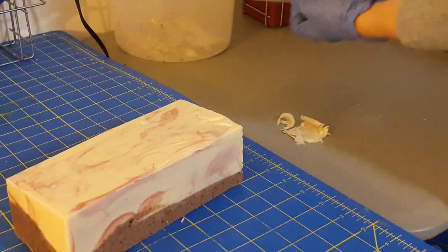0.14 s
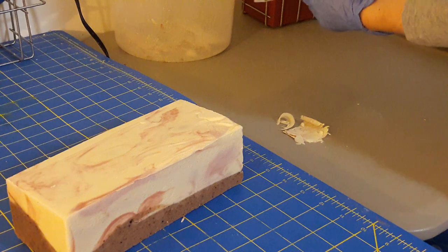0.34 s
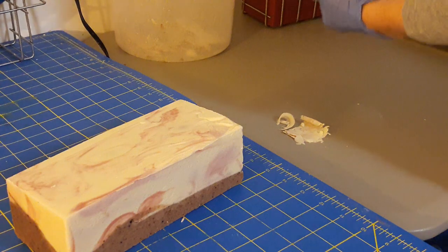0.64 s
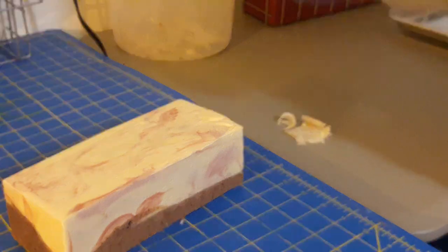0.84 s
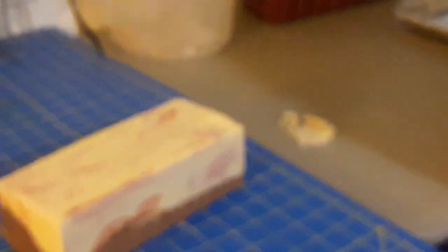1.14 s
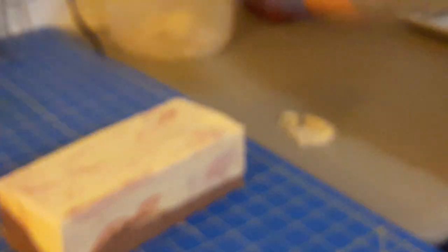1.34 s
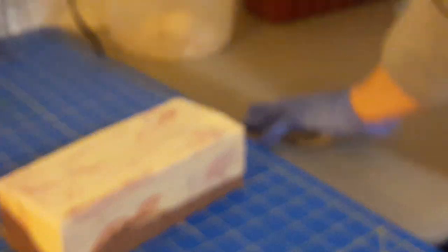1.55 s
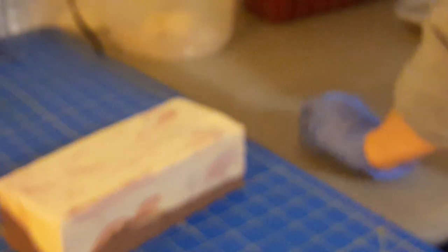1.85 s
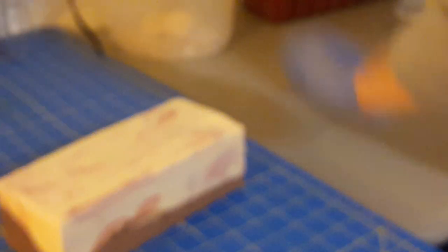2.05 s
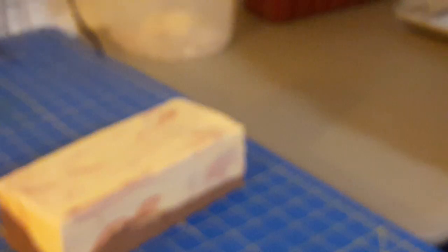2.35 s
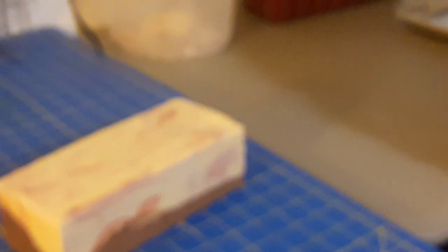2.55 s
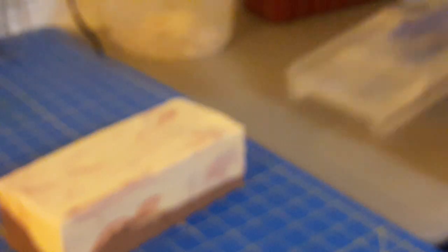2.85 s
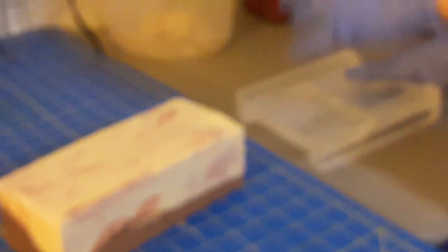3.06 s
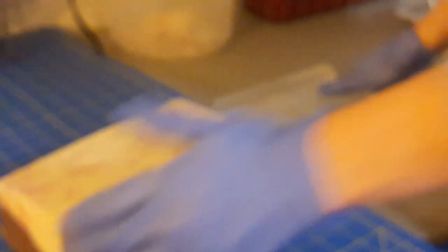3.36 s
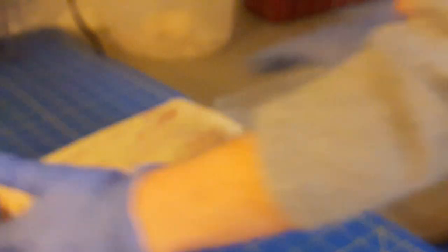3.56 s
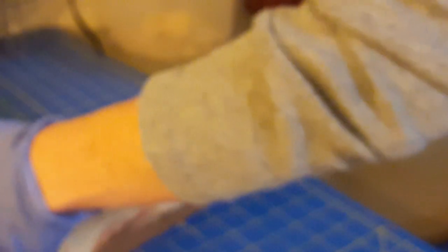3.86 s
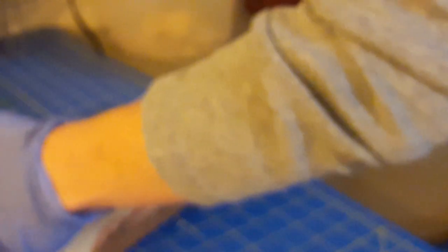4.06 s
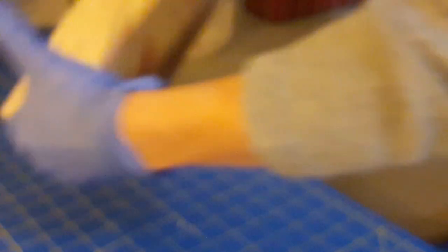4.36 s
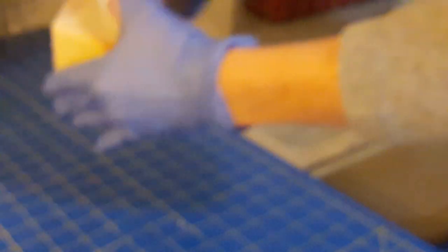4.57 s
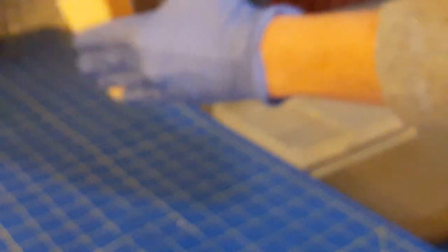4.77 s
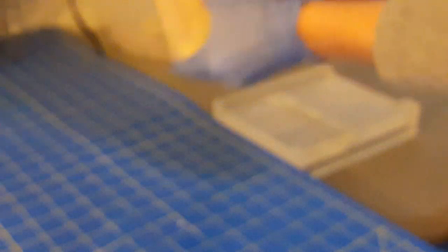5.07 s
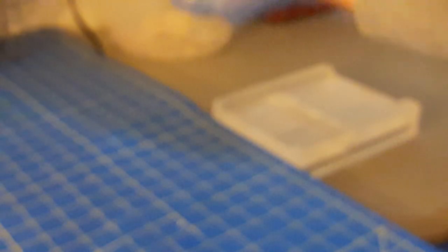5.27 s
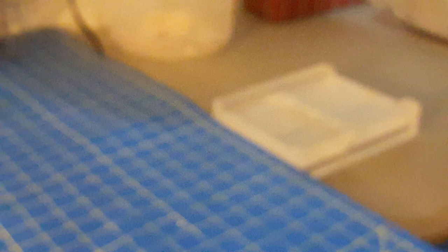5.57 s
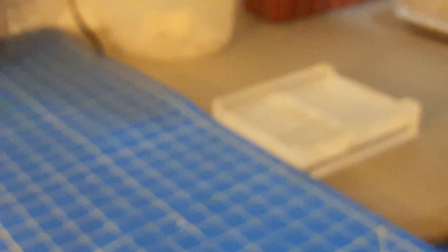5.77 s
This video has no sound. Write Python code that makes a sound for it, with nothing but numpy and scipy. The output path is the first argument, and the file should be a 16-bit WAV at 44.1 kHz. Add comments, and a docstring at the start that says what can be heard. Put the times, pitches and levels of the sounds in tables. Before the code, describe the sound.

A few knocks and a gloved sweep across a workbench, then a plastic planer drops with a hollow clatter over a fan's hum.

```python
"""Soap planer on a workbench

Gloved hands work at a soap maker's bench in a small room where a fan hums. An acrylic planer is put
aside and a hand sweeps shavings away. The planer is picked up, set down rocking on one edge, then drops
flat with a hollow clatter and hums on. A soap loaf is gripped and tipped up. Impacts excite the damped
modes of bench, shell, blade and loaf; rubbing is the noise of many tiny slips."""
import sys
import numpy as np
from scipy import signal
from scipy.fft import rfft, irfft, next_fast_len
from scipy.io import wavfile

SR = 44100
rng = np.random.default_rng(int(sys.argv[2]) if len(sys.argv) > 2 else 0)


def store_pcm(level_fs):
    """Save levels as 16-bit WAV."""
    pcm = np.round(np.clip(level_fs, -1, 1) * 32767).astype(np.int16)
    wavfile.write(sys.argv[1], SR, np.atleast_2d(pcm).T)


N = 261954
TIME = np.arange(N) / SR

# Reverberation time of the room: frequency_hz, t60_s
ROOM_T60 = [(80, 1), (250, 0.32), (700, 0.24), (2000, 0.16), (5000, 0.38), (14000, 0.3)]
# Likeness of left and right in the diffuse field: frequency_hz, correlation
COHERENCE = [(60, 0.85), (300, 0.34), (600, 0.18), (1200, 0), (2500, 0), (14000, 0)]
# Spectrum of the moving air: frequency_hz, level_db
AIR_SPECTRUM = [(25, -10), (42, -12.5), (75, 1.5), (140, -2.5), (230, -1.5), (350, -3), (430, -9),
                (850, -6), (1500, -10.5), (2200, -16), (3600, -25), (7200, -29), (10500, -31.5),
                (13500, -26), (15700, -25.5)]
# Tones of the fan: pitch_hz, rms_db
FAN_TONES = [(344.5, -79), (667.5, -91), (866.7, -88), (1034, -89), (1545, -94)]

# Strokes of the glove over bench, planer and loaf: full_pressure_s, rubbing_db, hiss_db, hold_s
STROKES = [(1.671, -61, -68.5, 0.0081), (1.806, -33.5, -60, 0.043), (1.933, -52, -68.5, 0.054),
           (2.57, -61, -78, 0.086), (3.584, -52.5, -57.5, 0.0232), (3.974, -61, -91.5, 0.02),
           (4.114, -57, -74.5, 0.009)]
# Rustles of glove and sleeve: centre_s, level_db, width_s
RUSTLES = [(0.23, -74.5, 0.018), (0.316, -62.5, 0.0089), (0.629, -67, 0.012), (0.817, -83, 0.022),
           (5.05, -77, 0.0052), (5.284, -80.5, .03)]
# Spectrum of rubbing on the bench: frequency_hz, level_db
RUB_SPECTRUM = [(35, -56), (60, -18), (159, -22), (215, -10), (285, -3), (413, -7.5), (486, -1), (613, -9),
                (810, -10.5), (1120, -18), (1350, -12.5), (2200, -24), (3580, -36.5), (5080, -39.5),
                (15500, -61)]
# Spectrum of the hiss of sliding rubber: frequency_hz, level_db
HISS_SPECTRUM = [(500, -29), (1900, 0), (3500, -1.5), (5200, -3.5), (7200, -3.5), (8300, -11),
                 (10500, -11.5), (15500, -14.5)]
# Spectrum of a rustle: frequency_hz, level_db
RUSTLE_SPECTRUM = [(200, -10), (1400, 5), (2500, -9), (3700, 0), (5500, -17.5), (7300, -11), (10000, -33),
                   (15000, -15)]

# Soft, dull bumps on the bench from hands and settling objects: start_s, thud_db
BUMPS = [(1.4312, -37.5), (1.695, -44.5), (2.579, -49.5), (2.631, -43.5), (3.447, -21.5), (3.629, -37.5),
         (3.972, -51.5)]
# Hard knocks of an edge on the bench: start_s, thud_db, clack_db, tick_db, note_hz, note_db
KNOCKS = [(1.357, -36, -36.5, -37.5, 366, -24.5), (1.3678, -26, -31.5, -47.5, 650, -32),
          (1.3787, -28, -28.5, -48, 867, -26), (1.9298, -48, -46, -68, 710, -43),
          (2.5913, -60.5, -43.5, -60, 880, -33), (2.6217, -47.5, -44.5, -53, 1520, -49),
          (3.1577, -25, -22.5, -37, 397, -33), (3.6016, -39, -41, -39.5, 1350, -40.5),
          (4.1147, -38.5, -43, -56.5, 1097, -42.5)]
# The planer lands on an edge and rocks: start_s, thud_db, clack_db, tick_db, note_hz, note_db, gap_s
LANDINGS = [(3.0451, -14.5, -26.5, -40.5, 346, -17.5, 0.0175), (3.168, -13, -27.5, -42, 439.1, -26, 0.0087)]
# The planer drops flat and bounces: start_s, thud_db, clack_db, tick_db, note_hz, note_db, gap_s, ring_db
DROPS = [(3.323, -15.5, -14, -38, 1480, -24.5, 0.0105, -25.5),
         (3.3716, -15.5, -7, -36, 1172, -17.5, 0.0285, -18.5)]
# Spectrum of a clack on the bench: frequency_hz, level_db
BENCH_CLACK_SPECTRUM = [(30, -47), (90, -19.5), (250, -9.5), (480, -2.5), (650, -1.5), (870, 0),
                        (1080, -3.5), (1450, -7.5), (2200, -13.5), (3500, -26), (6000, -39), (15000, -66.5)]
# Spectrum of a clack of the planer's shell: frequency_hz, level_db
SHELL_CLACK_SPECTRUM = [(30, -51.5), (120, -25.5), (350, -9.5), (620, 8.5), (950, 2.5), (1400, -3.5),
                        (1850, -12), (2300, -15), (3800, -28), (7000, -38.5), (15000, -67.5)]
# Spectrum of the bright tick of hard surfaces: frequency_hz, level_db
TICK_SPECTRUM = [(500, -30.5), (1800, -3), (3500, 0.5), (5200, -5), (6200, -5.5), (7200, -1.5),
                 (8100, -14.5), (8800, -8), (10500, -17), (15500, -21.5)]

# Modes of the loaf landing on the mat: pitch_hz, level_db, t60_s
LOAF_MODES = [(72, -6, 0.32), (115, -5, 0.18), (210, 4, 0.044)]
# Modes of the bench top: pitch_hz, level_db, t60_s
BENCH_MODES = [(98.5, -17, 0.15), (149.7, -9, 0.11), (239.7, -0.5, 0.072), (323.3, 2, 0.059),
               (414, -1, 0.037), (560, -8.5, 0.026)]
# Modes of the steel blade: pitch_hz, level_db, t60_s
BLADE_MODES = [(7100, -25, 0.27), (6950, -27, .25), (8790, -30, .28), (11300, -39, .15), (14300, -33, .15)]
# Stiff upper modes of the planer's shell: pitch_hz, level_db, t60_s
CRACK_MODES = [(2120, -19, .03), (2528, -15.5, 0.014), (2866, -20, .022), (3250, -23.5, .025),
               (4910, -31, .03)]
# Middle modes of the shell, its hollow ring: pitch_hz, level_db, t60_s
SHELL_MODES = [(507, -2.5, 0.089), (545, -1, 0.39), (615, -1, 0.14), (683, -1.5, .22), (800, -5, .22),
               (818, -7.5, 0.41), (916, -4.5, 0.11), (990, -8, 0.22), (1036, -5, 0.35), (1235, -4.5, 0.18),
               (1470, -11.5, .14), (1657, -11.5, 0.12), (2170, -12, 0.089), (2400, -9, .1),
               (3135, -12.5, .04)]
# Lowest, lightly damped modes of the shell: pitch_hz, level_db, t60_s
HUM_MODES = [(115.75, -40.5, .8), (185, -38.5, 1.1), (342, -48.5, 0.63)]


def from_db(db):
    """Amplitude ratio: tenfold for every 20 dB."""
    return 10 ** (np.asarray(db) / 20)


def unit_rms(x):
    """Normalisation to a mean power of 1."""
    return x / np.sqrt(np.mean(x ** 2) + 1e-20)


def at_hz(points, hz):
    """Interpolation of a table on a logarithmic frequency axis."""
    frequencies, values = np.transpose(points)
    return np.interp(np.log(np.maximum(hz, 1)), np.log(frequencies), values)


def through(x, response):
    """Convolution with the impulse response of a linear system; channels x N."""
    return signal.oaconvolve(np.atleast_2d(x), np.atleast_2d(response), axes=1)[:, :N]


def pulse(spectrum, size=4096):
    """Minimum phase: the most compact causal pulse with this spectrum; peak 1."""
    magnitude = from_db(at_hz(spectrum, np.fft.rfftfreq(size, 1 / SR)))
    cepstrum = irfft(np.log(magnitude))
    cepstrum[1:size // 2] *= 2
    cepstrum[size // 2 + 1:] = 0
    shape = irfft(np.exp(rfft(cepstrum)))
    return shape / np.abs(shape).max()


def diffuse_noise(size):
    """A diffuse field: left and right are alike in the bass and unrelated in the treble."""
    alike = np.clip(at_hz(COHERENCE, np.fft.rfftfreq(size, 1 / SR)), -.99, .99)
    mid, side = rfft(rng.standard_normal((2, size)))
    return irfft(np.sqrt(1 + alike) * mid + np.sqrt(1 - alike) * side * [[1], [-1]], size)


def contacts(times, levels_db, chatter=0., chatter_s=.01, size=4096):
    """Contact force: each impulse may be followed by a dying chatter of the surfaces."""
    force = np.zeros(N + size)
    for start_s, db in zip(times, levels_db):
        touch = rng.standard_normal(size) * np.exp(-TIME[:size] / chatter_s)
        touch *= chatter / np.linalg.norm(touch)
        touch[0] += 1
        force[round(start_s * SR):][:size] += from_db(db) * touch / np.linalg.norm(touch)
    return force[:N]


def rebounds(start_s, levels_db, gap_s, gap_ratio, loss_db, count):
    """Inelastic rebounds: each level falls by its loss_db per contact; gaps form a geometric series."""
    k = np.arange(count)
    gaps = gap_s * gap_ratio ** k
    times = start_s + np.cumsum(gaps) - gaps
    return np.column_stack([times, np.array(levels_db) - np.outer(k, loss_db)])


def friction(spectrum, slips_per_s, smooth):
    """Friction noise: countless tiny slips of uneven size over a smooth hiss; rms 1."""
    slips = (rng.random(N) < slips_per_s / SR) * rng.standard_normal(N)
    force = unit_rms(slips) + smooth * rng.standard_normal(N)
    return unit_rms(through(force, pulse(spectrum)))


def envelope(full_s, hold_s, rise_db_per_s, fall_db_per_s):
    """Exponential growth and decay on either side of a hold at gain 1."""
    before_s = np.clip(full_s - TIME, 0, 1)
    after_s = np.clip(TIME - full_s - hold_s, 0, 1)
    return from_db(-rise_db_per_s * before_s - fall_db_per_s * after_s)


def ringing(modes, lag_s=0.):
    """Free vibration as a sum of damped sines; a lag turns the phase of each mode."""
    t = TIME[:2 * SR]
    return sum(from_db(db - 60 * t / t60) * np.sin(2 * np.pi * hz * (t - lag_s)) for hz, db, t60 in modes)


def struck(modes, lag_s=0.):
    """Interference: neighbouring modes start in antiphase, so a blow swells over its first cycle."""
    return ringing(modes[::2], lag_s) - ringing(modes[1::2], lag_s)


def room(early_db, early_s, late_db):
    """Reverberation: early reflections from the bench clutter, then a tail that dies band by band."""
    size = SR * 2 // 3
    t, response = TIME[:size], 0
    edges_hz = np.geomspace(60, 16000, 17)
    noises = diffuse_noise(size), diffuse_noise(size)
    early = unit_rms(np.exp(-t / early_s) * (t > .0015))
    for k, (low, high) in enumerate(zip(edges_hz, edges_hz[1:])):
        t60_s = at_hz(ROOM_T60, np.sqrt(low * high))
        late = unit_rms(from_db(-60 * t / t60_s) * (1 - np.exp(-t / .008)))
        decay = np.hypot(from_db(early_db) * early, from_db(late_db) * late)
        bandpass = signal.butter(2, [low, high], "band", fs=SR, output="sos")
        left, right = signal.sosfilt(bandpass, noises[k % 2] * decay)
        # every band brings the same energy per Hz to both sides
        gain = np.sqrt(np.mean(decay ** 2) * 2 * (high - low)) / SR
        response = response + gain * np.vstack([unit_rms(left), unit_rms(right)])
    return response


def fan(air_db=-69):
    """Broadband air noise with faint tones, which waver by a random walk of phase."""
    noise = diffuse_noise(next_fast_len(N))[:, :N]
    air = from_db(air_db) * unit_rms(through(noise, pulse(AIR_SPECTRUM)))
    drifts = 3 * np.cumsum(rng.standard_normal((len(FAN_TONES), N)), axis=1) / np.sqrt(SR)
    return air + sum(np.sqrt(2) * from_db(db) * np.sin(2 * np.pi * hz * TIME + drift)
                     for (hz, db), drift in zip(FAN_TONES, drifts))


def glove(hiss_swell_db=13, fidget_db=-82, fidget_step_s=.058, fidget_end_s=1.05):
    """Sliding friction follows pressure as the glove sweeps or grips; the moving hand rustles."""
    pressure = sum(from_db(db) * envelope(s, hold_s, rise_db_per_s=430.5, fall_db_per_s=428)
                   for s, db, _, hold_s in STROKES)
    sweep = pressure * friction(RUB_SPECTRUM, slips_per_s=900, smooth=.7)
    # rubber hiss swells slowly in a long stroke, at once in a short grab
    touch = sum(from_db(db) * envelope(s, hold_s, hiss_swell_db / hold_s, fall_db_per_s=230)
                for s, _, db, hold_s in STROKES)
    hiss = touch * friction(HISS_SPECTRUM, slips_per_s=1800, smooth=.89)
    moves = sum(from_db(db) * np.exp(-.5 * ((TIME - s) / width_s) ** 2) for s, db, width_s in RUSTLES)
    # at first the fingers shift on the planer
    swing_db = np.interp(TIME / fidget_step_s, np.arange(N), rng.standard_normal(N))
    fidget = from_db(fidget_db + swing_db) * (TIME < fidget_end_s)
    rustle = (moves + fidget) * friction(RUSTLE_SPECTRUM, slips_per_s=430, smooth=.58)
    rub = sweep + hiss + rustle
    return .46 * rub + through(rub, room(early_db=-9.5, early_s=.0068, late_db=-5))


def loaf_bump(start_s=4.1095, force_db=-41):
    """A soft impact sounds only low modes: the heavy loaf tips onto the mat."""
    return through(contacts([start_s], [force_db]), struck(LOAF_MODES))


def blade_ring():
    """Lightly damped steel modes sing faintly after the first knock, as the planer is put aside."""
    start_s, _, _, tick_db, *_ = KNOCKS[0]
    return through(contacts([start_s], [tick_db]), struck(BLADE_MODES))


def edge_scrape(below_clack_db=11.5):
    """Stick-slip friction: the edge of the rocking planer drags coarsely over the bench."""
    drag = sum(from_db(clack_db - below_clack_db) * (TIME > s)
               * envelope(s, hold_s=.045, rise_db_per_s=0, fall_db_per_s=170.5)
               for s, _, clack_db, *_ in LANDINGS)
    scrape = drag * friction(RUB_SPECTRUM, slips_per_s=410, smooth=.5)
    return .8 * scrape + through(scrape, room(early_db=-4, early_s=.018, late_db=-6.5))


def bench_blows():
    """Impacts of bumping, knocking and rocking: start_s, thud_db, clack_db, tick_db."""
    bumps = [(s, thud_db, thud_db - 12, thud_db - 13) for s, thud_db in BUMPS]
    # the gaps widen as the hand slows the rocking
    rocking = [rebounds(s, (thud, clack, tick), gap_s, gap_ratio=1.27, loss_db=(2.47, 1.43, .5), count=5)
               for s, thud, clack, tick, _, _, gap_s in LANDINGS]
    return np.vstack([bumps, [row[:4] for row in KNOCKS], *rocking])


def planer_bounces():
    """Energy loss makes bounces weaker and closer: start_s, thud_db, clack_db, tick_db, ring_db."""
    return np.vstack([
        rebounds(s, (thud, clack, tick, ring), gap_s, gap_ratio=.85, loss_db=(2, 6.5, 3.4, 3.5), count=6)
        for s, thud, clack, tick, _, _, gap_s, ring in DROPS])


def bench_thuds(blows):
    """The bench top acts as a soundboard: every blow makes its low modes boom briefly."""
    times, thud_db = np.transpose([row[:2] for row in blows])
    thud = through(contacts(times, thud_db), struck(BENCH_MODES))
    return .62 * thud + through(thud, room(early_db=-7.5, early_s=.02, late_db=-9.5))


def bench_knocks(blows):
    """Brief contacts have broad spectra: surfaces meet on the bench with a clack and a bright tick."""
    times, _, clack_db, tick_db = blows.T
    clack = through(contacts(times, clack_db, chatter=1, chatter_s=.0059), pulse(BENCH_CLACK_SPECTRUM))
    tick = through(contacts(times, tick_db, chatter=5.5, chatter_s=.0067), pulse(TICK_SPECTRUM))
    return (1.62 * clack + through(clack, room(early_db=5.5, early_s=.0099, late_db=6))
            + .78 * tick + through(tick, room(early_db=8, early_s=.013, late_db=6)))


def edge_taps(t60_s=.026, overtone_ratio=1.83, overtone_db=-13.5):
    """Heavy damping: an edge landing squarely gives a short note and a weaker, inharmonic overtone."""
    taps = 0
    for start_s, _, _, _, note_hz, note_db, *_ in KNOCKS + LANDINGS + DROPS:
        modes = [(note_hz, 0, t60_s), (note_hz * overtone_ratio, overtone_db, t60_s)]
        taps = taps + through(contacts([start_s], [note_db]), struck(modes))
    return taps + through(taps, room(early_db=-13, early_s=.01, late_db=-9.5))


def shell_crack():
    """Only the first, hardest contact of a drop excites the shell's stiff upper modes."""
    times, _, clack_db, *_ = np.transpose(DROPS)
    crack = through(contacts(times, clack_db), struck(CRACK_MODES))
    return .49 * crack + through(crack, room(early_db=-7.5, early_s=.011, late_db=-14))


def shell_hum(bounces, damped_at_s=4.3, damping_s=.033):
    """Free decay: the lowest modes hum on from the hardest bounce until a hand rests on the bench."""
    times, _, clack_db, *_ = bounces.T
    hum = through(contacts([times[np.argmax(clack_db)]], [0]), ringing(HUM_MODES))
    return hum * np.exp(-np.maximum(TIME - damped_at_s, 0) / damping_s)


def shell_clatter(bounces, antiphase_hz=562.5, tick_cutoff_hz=7500):
    """Impact excitation: at each bounce the planer's hollow shell clacks, ticks and rings."""
    times, _, clack_db, tick_db, ring_db = bounces.T
    clack = through(contacts(times, clack_db, chatter=.14, chatter_s=.0023), pulse(SHELL_CLACK_SPECTRUM))
    left, right = clack + through(clack, room(early_db=6, early_s=.0058, late_db=4))
    # near antiphase_hz the clack reaches left and right in opposite phase, so it sounds wide
    right = right - 2 * signal.lfilter(*signal.iirpeak(antiphase_hz, Q=3.8, fs=SR), right)
    tick = through(contacts(times, tick_db, chatter=2.3, chatter_s=.0024), pulse(TICK_SPECTRUM))
    tick = signal.lfilter(*signal.butter(2, tick_cutoff_hz, fs=SR), tick)
    tick = .34 * tick + through(tick, room(early_db=-8.5, early_s=.012, late_db=8.5))
    # the ringing also reaches the two sides out of step
    shell = np.vstack([struck(SHELL_MODES), struck(SHELL_MODES, lag_s=.00049)])
    ring = from_db(-12) * through(contacts(times, ring_db), shell)
    return np.vstack([left, right]) + tick + ring


def scene(radiates_above_hz=91, lean_db=1.2):
    """Superposition: the fan fills the room and the handling sounds lean a little to the left."""
    blows, bounces = bench_blows(), planer_bounces()
    handling = (glove() + loaf_bump() + blade_ring() + edge_scrape()
                + bench_thuds([*blows, *bounces]) + bench_knocks(blows) + edge_taps()
                + shell_crack() + shell_hum(bounces) + shell_clatter(bounces))
    # small objects radiate little deep bass
    handling = signal.sosfilt(signal.butter(2, radiates_above_hz, "high", fs=SR, output="sos"), handling)
    return fan() + handling * from_db([[lean_db], [-lean_db]])


def record(dry):
    """Band limiting: the deepest bass rolls off and the highest treble is cut steeply."""
    low_hz, high_hz = 22, 15800
    thinned = signal.sosfilt(signal.butter(2, low_hz, "high", fs=SR, output="sos"), dry)
    return signal.sosfilt(signal.ellip(10, .1, 70, high_hz, fs=SR, output="sos"), thinned)


dry = scene()
out = record(dry)
store_pcm(out)
```